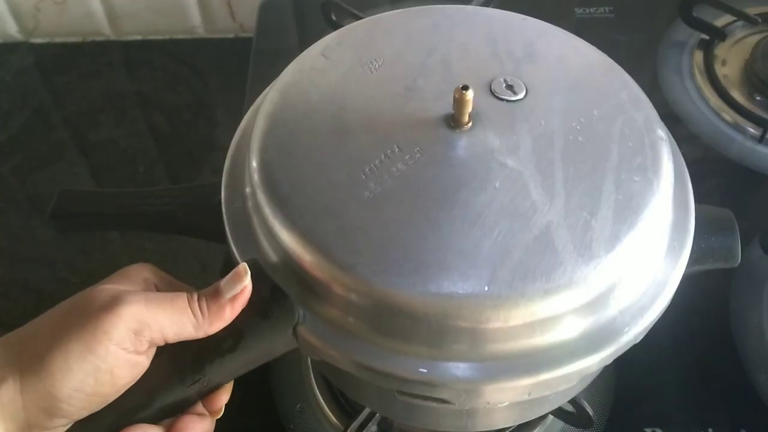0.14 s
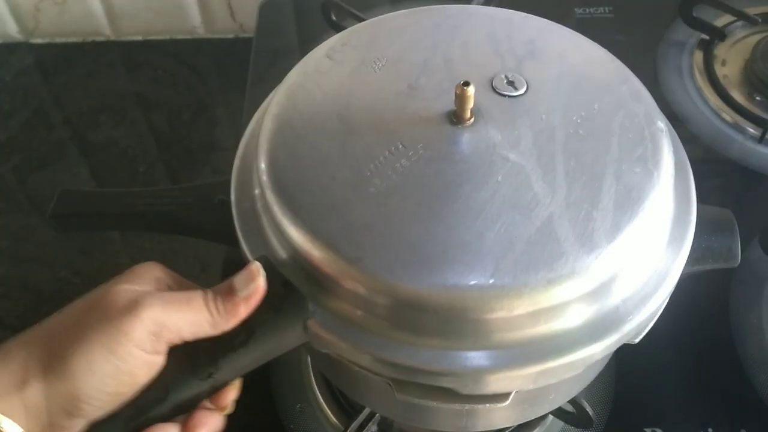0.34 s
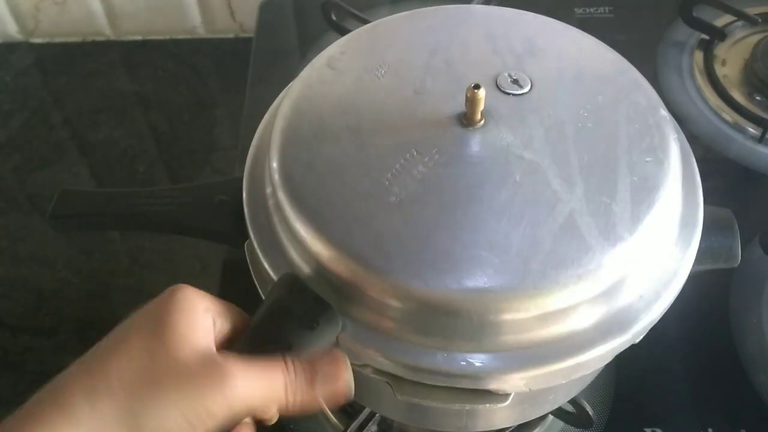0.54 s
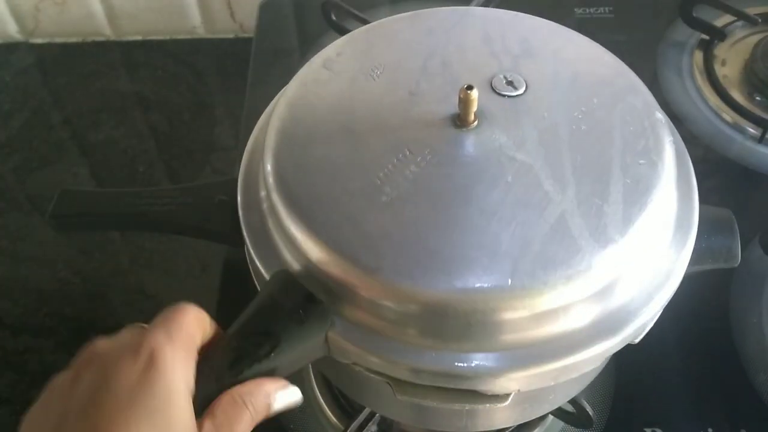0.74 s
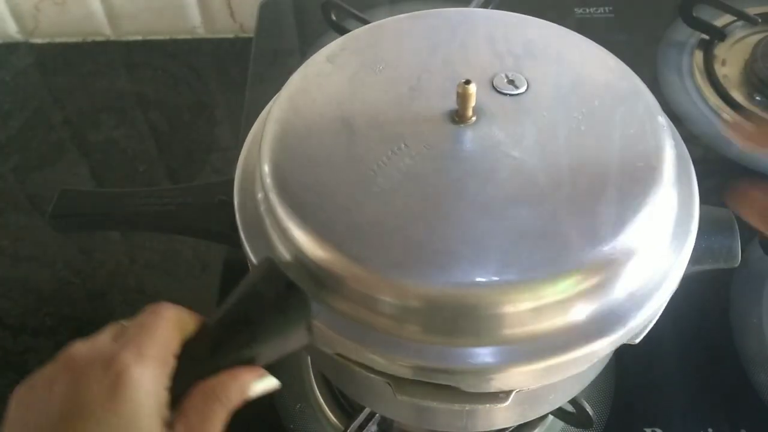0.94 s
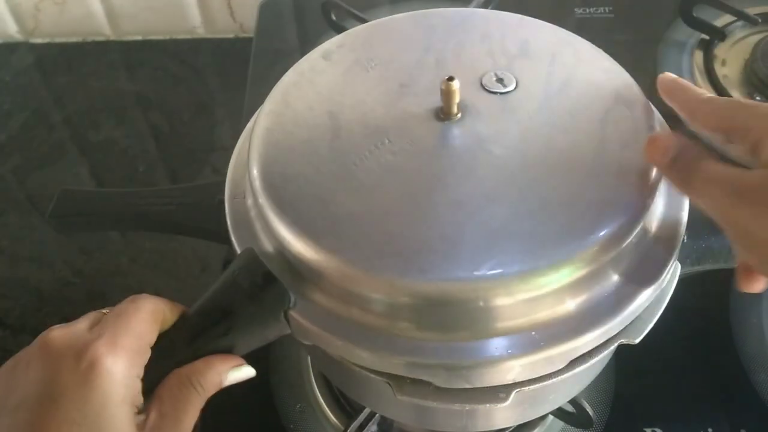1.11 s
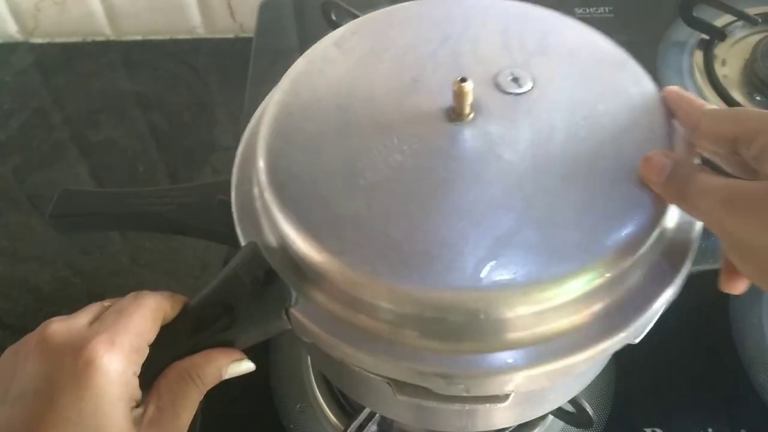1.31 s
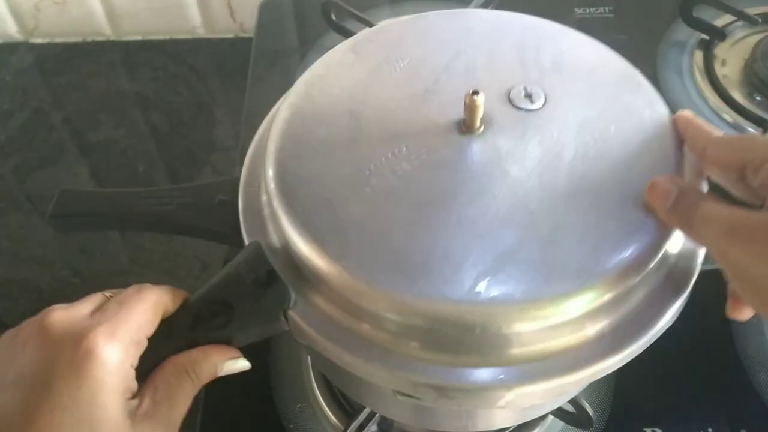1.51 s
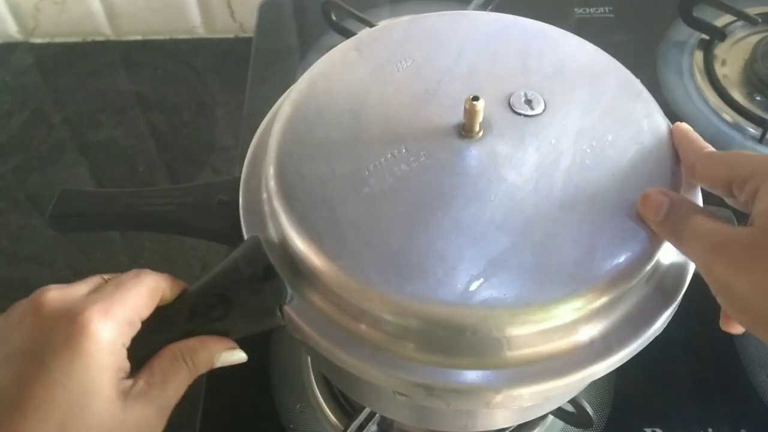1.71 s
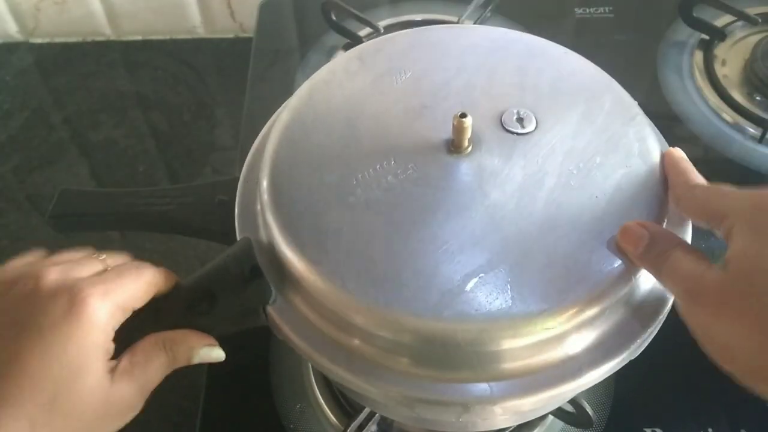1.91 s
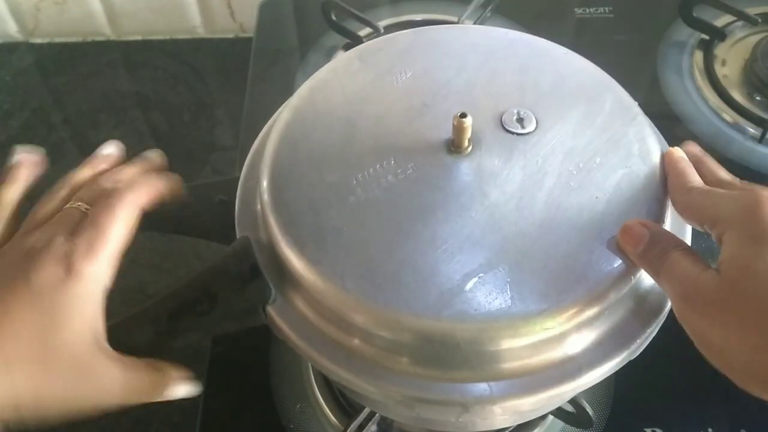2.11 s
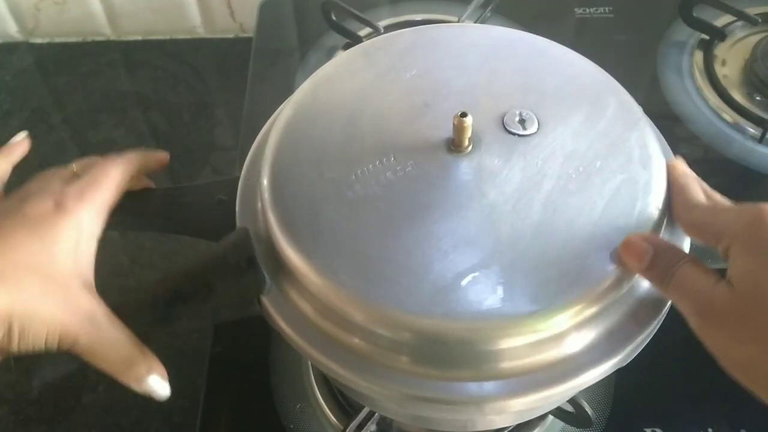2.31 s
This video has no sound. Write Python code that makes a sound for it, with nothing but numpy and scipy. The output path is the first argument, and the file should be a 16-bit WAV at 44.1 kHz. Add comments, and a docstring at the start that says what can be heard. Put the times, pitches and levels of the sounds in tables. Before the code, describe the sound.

Aluminium pressure cooker lid clanks and rattles onto its pot, with a short scrape, in a kitchen

```python
"""Clanks, rattles, knocks and a scrape: an aluminium pressure cooker lid is worked onto its pot in a kitchen.
Each rim contact is a crack and a dense clatter of noise plus clear ringing modes; knocks are fading tones.
The scrape is a burst of tiny random slips that ring the metal, and a dull rub is coloured noise.
Under it lie a low rumble, a faint hum and a hiss with a faint whistle, whose treble dips twice briefly."""
import sys
import numpy as np
from scipy import signal
from scipy.fft import rfft, irfft, next_fast_len
from scipy.io import wavfile

SR = 44100
rng = np.random.default_rng(int(sys.argv[2]) if len(sys.argv) > 2 else 0)


def transcribe(u):
    """Save the signal u as a 16-bit wav file named by the first command-line argument.

    u: samples, shape (n,) or (channels, n), limited to [-1, 1]; the rate is SR.
    q: integer samples, one column per channel.
    """
    v = np.clip(np.atleast_2d(u).T, -1, 1)
    q = np.round(v * 32767).astype(np.int16)
    wavfile.write(sys.argv[1], SR, q)


N = 103635

# How alike left and right are, from 0 (unrelated) to 1 (the same): f/Hz, likeness
LIKENESS = [(100, 0.76), (300, 0.96), (700, 0.37), (1400, 0.065), (3000, 0.048), (9000, 0.047)]
ATTACK_S = 0.00043  # time constant of the onset of every clank and knock
STRIKE_SAMPLES = SR // 2  # each clank or knock is followed for half a second


def amp(db):
    """Turn decibels into a gain."""
    return 10 ** (np.asarray(db) / 20)


def unit(x):
    """Scale a sound to an rms of 1."""
    return x / np.sqrt(np.mean(x ** 2) + 1e-20)


def along(points, hz):
    """Read a table of (Hz, value) at any frequency, on a log frequency axis."""
    f, v = np.transpose(points)
    return np.interp(np.log(hz + 1), np.log(f + 1), v)


def curve(rows):
    """Join (s, value) points with straight lines, one value per sample."""
    return np.interp(np.arange(N) / SR, *np.transpose(rows))


def filtered(x, response):
    """Multiply the spectrum of a sound by a response that depends on frequency."""
    size = x.shape[-1]
    padded = next_fast_len(size + 8192)
    spectrum = rfft(x, padded) * response(np.fft.rfftfreq(padded, 1 / SR))
    return irfft(spectrum, padded)[..., :size]


def noise(spectrum, alike, size):
    """Make coloured stereo noise of rms 1; mid and side noise are mixed to set the left-right likeness."""
    def mid_side_gains(hz):
        angle = np.arccos(np.clip(along(alike, hz), -1, 1)) / 2
        return amp(along(spectrum, hz)) * [np.cos(angle), np.sin(angle)]

    mid, side = filtered(rng.standard_normal((2, size)), mid_side_gains)
    return unit(np.array([mid + side, mid - side]))


def fade(t, t60):
    """Die away exponentially, by 60 dB in t60 seconds."""
    return np.exp(-np.log(1000) * t / t60)


def add(track, s, sound):
    """Mix a sound into the track at s seconds, cut off at the end of the track."""
    part = track[:, round(s * SR):][:, :sound.shape[-1]]
    part += sound[..., :part.shape[-1]]


def rumble():
    """Low noise, nearly the same left and right, that swells and sinks."""
    # Colour of the rumble: f/Hz, level/dB
    rumble_colour = [(8, -77), (17, 15), (24, 9.5), (33, 7), (52, -4), (75, -13), (200, -79)]
    # Swelling around the base level: t/s, level/dB
    swell = [(0, 3.5), (.7, -0.5), (.98, 8.5), (1.4, 2), (1.9, -2), (2.04, 7.5), (2.35, 0.5)]
    base_db = -42
    return amp(base_db + curve(swell)) * noise(rumble_colour, [(30, 0.99)], size=N)


def hum(pitch_hz=105.3, peak_db=-56):
    """A steady, faint sine tone."""
    t = np.arange(N) / SR
    return amp(peak_db) * np.sin(2 * np.pi * pitch_hz * t)


def hiss():
    """Air noise with a whistle, a narrow band of noise; the upper part and the whistle dip twice."""
    # Colour of the air noise: f/Hz, level/dB
    air_colour = [(70, -4), (130, -16.5), (200, -7.5), (300, -14), (480, -15), (800, -21), (1300, -23),
                  (2000, -25), (4000, -30), (4700, -34), (6500, -37.5), (9200, -40), (11500, -58),
                  (15500, -73)]
    # Loudness of the air noise before the dips: t/s, level/dB
    air_level = [(0, -47), (.2, -47), (.7, -50), (1.25, -50.5), (1.9, -49.5), (2.15, -48), (2.35, -46.5)]
    # Loudness of the whistle before the dips: t/s, level/dB
    whistle_level = [(0, -58.5), (.3, -73), (1.95, -74.5), (2.03, -63), (2.1, -65), (2.24, -53),
                     (2.35, -61)]
    # Dips of the treble: start/s, end/s, depth/dB, recovery/s
    dips = [(1.293, 1.352, -39, .011), (1.929, 1.957, -16.5, 0.078)]
    dip_from_hz = 1900  # the dips act mostly above this
    whistle_hz, whistle_width_hz = 4570, 370

    air = amp(curve(air_level)) * noise(air_colour, LIKENESS, size=N)
    low_air = filtered(air, lambda hz: 1 / (1 + (hz / dip_from_hz) ** 4))
    narrow_band = lambda hz: 1 / (1 + (2 * (hz - whistle_hz) / whistle_width_hz) ** 2)
    whistle = amp(curve(whistle_level)) * unit(filtered(rng.standard_normal((2, N)), narrow_band))
    # each dip sinks within 5 ms, holds, then recovers
    dip_db = sum(curve([(start - .005, 0), (start, depth), (end, depth), (end + recovery, 0)])
                 for start, end, depth, recovery in dips)
    return low_air + amp(dip_db) * (air - low_air + whistle)


def rub():
    """The lid rubs dully on its seal while the handle is worked: coloured noise of changing loudness."""
    # Colour of the rubbing: f/Hz, level/dB
    rub_colour = [(150, -14), (230, -8), (330, -20), (450, -0.5), (550, -3), (680, -18), (950, -15),
                  (1500, -17.5), (4000, -33.5), (12000, -54)]
    # Loudness of the rubbing: t/s, level/dB
    rub_level = [(0, -43), (.1, -52), (.6, -51.5), (.9, -49), (1.03, -46), (1.15, -52.5), (1.3, -56),
                 (1.8, -85)]
    return amp(curve(rub_level)) * noise(rub_colour, LIKENESS, size=N)


def slide(slip_t60=0.041, tail_t60=0.4, tail_db=-14):
    """The rim scrapes round: tiny random slips swell and die, each ringing the metal briefly."""
    # Colour of the metal as it scrapes: f/Hz, level/dB
    scrape_colour = [(60, -22), (160, 0.5), (450, -10), (750, -4), (920, 1.5), (1010, 10.5), (1120, -22),
                     (1500, -3.5), (2300, -7.5), (4000, -12), (5200, -30), (8600, -22), (11000, -44),
                     (15500, -62)]
    peak_s, peak_db = 1.736, -28
    rise_db_per_s, fall_db_per_s = 300, 810
    slips_per_s = 1100  # on average

    t = np.arange(N) / SR
    slips = (rng.random(N) < slips_per_s / SR) * rng.standard_normal(N)
    stroke = amp(peak_db + np.minimum(rise_db_per_s * (t - peak_s), fall_db_per_s * (peak_s - t)))
    age = t[:SR // 3]
    decay = fade(age, slip_t60) + amp(tail_db) * fade(age, tail_t60)
    body = noise(scrape_colour, LIKENESS, size=len(age)) * decay
    body = body / np.linalg.norm(body[0])
    return signal.fftconvolve((unit(slips) * stroke)[None], body, axes=1)[:, :N]


def fine_modes(lowest_hz=2450, spacing_hz=35, spread_db=5):
    """The crowded upper modes of the metal: a random (Hz, dB) ripple, flat below the lowest one."""
    hz = np.arange(lowest_hz, SR / 2, spacing_hz)
    db = np.clip(rng.standard_normal(len(hz)), -2, 2) * spread_db - spread_db / 2
    return np.column_stack([hz, db * (hz > lowest_hz)])


def mode(hz, t):
    """One fading mode in stereo; its pitch shifts and wanders as the lid moves on the rim."""
    # How long modes ring: f/Hz, time to fall 60 dB/s
    mode_ring_time = [(226, 0.44), (500, 0.3), (1000, .22), (2000, 0.25), (4000, 0.17)]
    shift, blur = .002, .0012  # random detuning and width of the pitch blur, as shares of the pitch
    spread_rad = 0.72  # random phase of each side at 1 kHz

    pitch = hz * (1 + shift * rng.normal())
    wander = np.cumsum(rng.standard_normal(len(t))) * np.sqrt(2 * np.pi * blur * hz / SR)
    side_phase = spread_rad * np.sqrt(hz / 1000) * rng.standard_normal((2, 1))
    phase = rng.uniform(0, 2 * np.pi) + side_phase
    return fade(t, along(mode_ring_time, hz)) * np.sin(2 * np.pi * pitch * t + wander + phase)


def clank(fine, level_db, bass_db, body_db, clang_db, treble_db, ring_db, pan_db):
    """One contact: a short crack, a dense clatter and the clear modes, all coloured by how it lands."""
    # Dense, short-lived modes between the clear ones: f/Hz, level/dB
    clatter_colour = [(60, -27), (150, -10), (260, -3), (480, 0), (700, -7), (930, -0.5), (1090, -8),
                      (1290, -1.5), (1500, -12.5), (2000, -7.5), (2800, -13), (3800, -11), (5000, -21.5),
                      (7000, -25.5), (8600, -27.5), (11000, -50.5), (15500, -66)]
    # How long the clatter lasts, with the kitchen's answer: f/Hz, time to fall 60 dB/s
    clatter_ring_time = [(200, 0.43), (1000, 0.25), (4000, 0.26), (9000, 0.18), (14000, 0.19)]
    # Colour of the crack against the clatter: f/Hz, level/dB
    crack_tilt = [(1000, 0.5), (5000, -4), (9000, -1.5)]
    # Clear modes of lid and pot: f/Hz
    mode_pitches = [226, 405, 447, 531, 571, 637, 871, 989, 1163, 1220, 1305, 1381, 1771, 1877, 1972, 2225,
                    2381, 3560]
    # Their levels before the colour of the contact, in the same order: level/dB
    mode_levels = [-16.5, -16, -11.5, -10.5, -10.5, -12.5, -12, -3.5, -9, -18, -23, -4.5, -10.5, -7.5, -9,
                   -8, -15, -10]
    crack_db, clatter_db, crack_t60_s, crack_alike = 0, -7.5, 0.038, 0.83
    fresh_share = .25  # share of the upper ripple that is drawn anew for each contact
    scatter_db = 1.5  # random spread of the mode levels

    t = np.arange(STRIKE_SAMPLES) / SR
    tilt = [(486, bass_db), (980, 0), (1540, 0), (6660, treble_db)]  # f/Hz, level/dB
    band = lambda hz, edges: np.interp(hz, edges, [0, 1, 1, 0])

    def colour(hz):
        body = body_db * band(hz, (810, 1130, 1400, 1600))
        clang = clang_db * band(hz, (1300, 1750, 2050, 2900))
        # contacts weaker than -14 dB gain topmost treble, 0.2 dB per dB
        top = np.interp(hz, (9000, 12000), [0, -0.2 * (level_db + 14)])
        return amp(along(tilt, hz) + body + clang + top)

    crack_response = lambda hz: colour(hz) * amp(along(crack_tilt, hz))
    crack_noise = noise(clatter_colour, [(1000, crack_alike)], size=len(t))
    crack = filtered(crack_noise, crack_response) * fade(t, crack_t60_s)

    ripple = np.where(rng.random((len(fine), 1)) < fresh_share, fine_modes(), fine)
    clatter_response = lambda hz: colour(hz) * amp(along(ripple, hz))
    dense = filtered(noise(clatter_colour, LIKENESS, size=len(t)), clatter_response)
    # each frequency of the clatter fades at its own rate
    hz, frame_s, frames = signal.stft(dense, SR, nperseg=256)
    faded = frames * fade(frame_s, along(clatter_ring_time, hz)[:, None])
    clatter = signal.istft(faded, SR)[1][:, :len(t)]

    ring = sum(amp(db + scatter_db * rng.normal()) * colour(f) * mode(f, t)
               for f, db in zip(mode_pitches, mode_levels))
    pan = pan_db * np.array([[.5], [-.5]])
    gain = amp(level_db + pan) * (1 - np.exp(-t / ATTACK_S))
    return gain * (amp(crack_db) * crack + amp(clatter_db) * clatter + amp(ring_db) * ring)


def knock(hz, level_db, t60):
    """A hollow knock: one fading tone, the same left and right."""
    t = np.arange(STRIKE_SAMPLES) / SR
    onset = 1 - np.exp(-t / ATTACK_S)
    return amp(level_db) * onset * fade(t, t60) * np.cos(2 * np.pi * hz * t)


def lid():
    """The rim strikes the pot again and again; square landings add hollow knocks and rings."""
    # Rim contacts: t/s, level/dB, bass/dB, body near 1.2 kHz/dB, clang near 2 kHz/dB, treble/dB,
    # ring of the clear modes/dB, left minus right/dB
    contacts = [(0.2412, -26, 5, 1, 0, 8, -2.5, 1), (.247, -19.5, -1, 5, 6, 8.5, -5.5, 0.5),
                (.253, -25, 1, 4, -0.5, 3, -3.5, -1), (0.275, -32.5, -0.5, 2.5, 6.5, 0, 0, 5),
                (.3066, -24, -0.5, 0.5, -6.5, 4, -5.5, 0), (.376, -28.5, -0.5, -3.5, 0, -7.5, -9.5, -.5),
                (0.4622, -22, -0.5, -5, 5, 7.5, -5.5, 1.5), (.467, -17.5, -8, 4, 0.5, 4, -4, -0.5),
                (.479, -17, -2.5, -11.5, 0, 2, -8, 2), (0.5389, -21, -5, -0.5, -4, 0, -6, 1),
                (.751, -37, 7, -3, -0.5, 6, -4.5, 1.5), (.777, -46, 11.5, 2, 0, -2, 1, -2),
                (0.787, -37.5, -12, 1.5, 5, 19, -6.5, 2), (.814, -27.5, 4.5, -0.5, -2.5, -5.5, -5, 0),
                (1.351, -24, 2.5, -3.5, -11, -3, -1, 1), (1.362, -25, -1.5, 1, -7.5, 1, -2.5, -1),
                (1.42, -21, -1.5, 1, -6, 0, -4.5, 1.5), (1.458, -22, -1.5, -0.5, -6.5, -6.5, -10, 1.5),
                (1.512, -25.5, 2.5, 4.5, -1, 1, -4, -2), (1.517, -17, 0, 0.5, -2, 1, -10, 0.5),
                (1.649, -40, 9.5, 3.5, 3, -28, -6.5, -0.5), (1.672, -39.5, 3, 3, -5, -13, -3, 4),
                (1.689, -33.5, 5, 3, -3.5, 4.5, 0, -3), (1.708, -36.5, -6, 4, -1, 14, -5, -2),
                (1.722, -34.5, 2, -1, 0, 19.5, -7.5, 2), (1.726, -30, -5, -0.5, 2, 6, -6.5, 3),
                (2.067, -31, -0.5, -1.5, 0, 7, -13.5, -0.5), (2.19, -36, -2, -1, -7.5, -7, -9.5, -1),
                (2.219, -49.5, -12, -9, 1, 14.5, -14, 0)]
    # Knocks where the lid lands squarely: t/s, f/Hz, level/dB, time to fall 60 dB/s
    knocks = [(.243, 528.7, -17.5, 0.17), (.244, 229, -25.5, 0.25), (0.244, 898, -21.5, .05),
              (.256, 1813, -21.5, 0.14), (.3072, 470, -22.5, 0.13), (0.469, 1381, -17, .17),
              (.4675, 1217, -14, 0.035), (.468, 872, -21.5, 0.11), (.477, 412, -19, 0.12),
              (0.5406, 235, -33.5, 0.26), (.814, 521, -24.5, 0.14), (1.352, 513, -18.5, 0.086),
              (1.351, 1294, -16.5, 0.07), (1.355, 998, -26.5, 0.28), (1.513, 409.8, -15, .19),
              (1.517, 1252, -9.5, 0.025), (1.674, 420, -18.5, 0.034), (1.689, 402.7, -24, 0.15),
              (1.689, 247, -26.5, 0.078), (1.722, 994, -24, 0.15), (1.722, 173, -30, 0.12),
              (1.73, 97.8, -32.5, 0.28), (2.068, 156, -39, 0.13)]
    out = np.zeros((2, N))
    shared_ripple = fine_modes()
    for s, *landing in contacts:
        add(out, s, clank(shared_ripple, *landing))
    for s, *tone in knocks:
        add(out, s, knock(*tone))
    return out


def scene():
    """Mix all sources; the sound reaches the right side of the microphone first."""
    right_lead_s = .00007
    side = np.array([[1], [-1]])  # left is delayed and right advanced, by half the lead each
    lead = lambda hz: np.exp(-1j * np.pi * hz * right_lead_s * side)
    kitchen = rumble() + hum() + hiss()
    return filtered(kitchen + rub() + slide() + lid(), lead)


def record(dry):
    """The recorder keeps nothing from 15650 Hz upwards."""
    return filtered(dry, lambda hz: hz < 15650)


dry = scene()
out = record(dry)
transcribe(out)
```